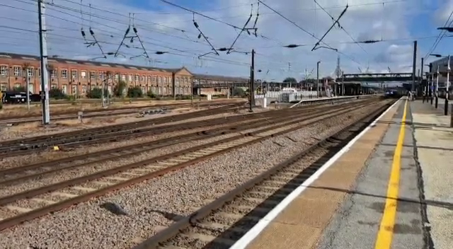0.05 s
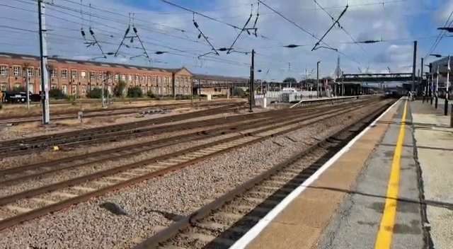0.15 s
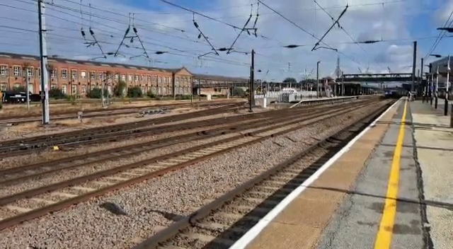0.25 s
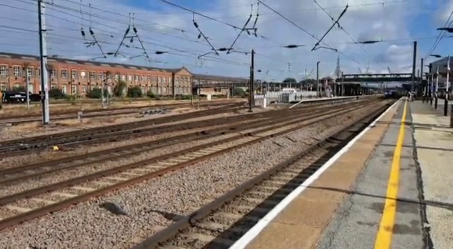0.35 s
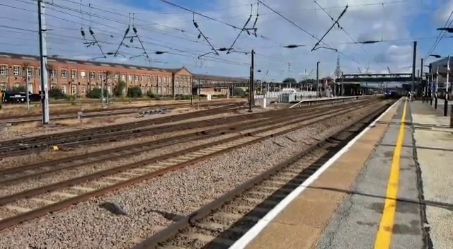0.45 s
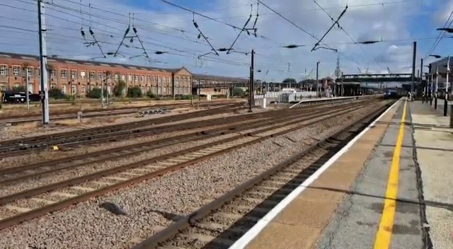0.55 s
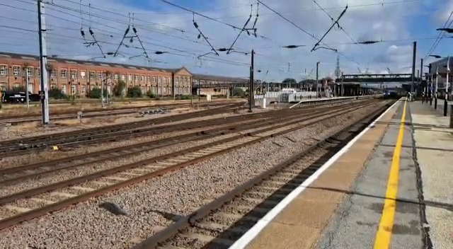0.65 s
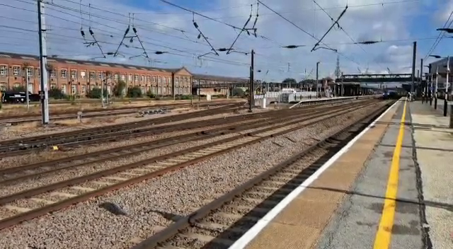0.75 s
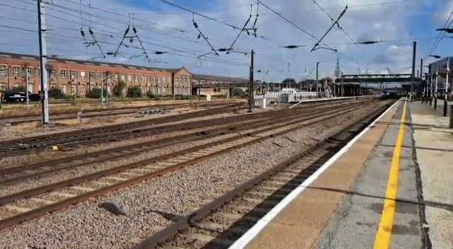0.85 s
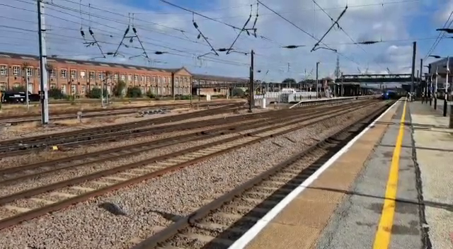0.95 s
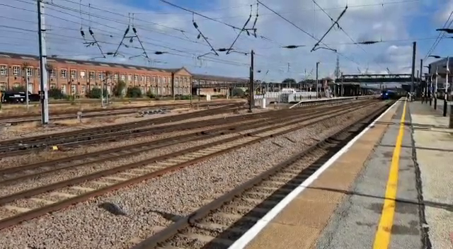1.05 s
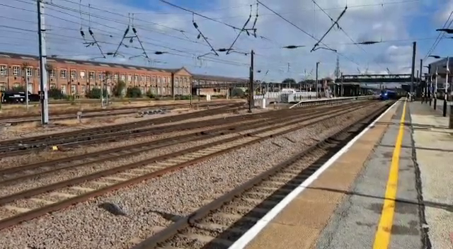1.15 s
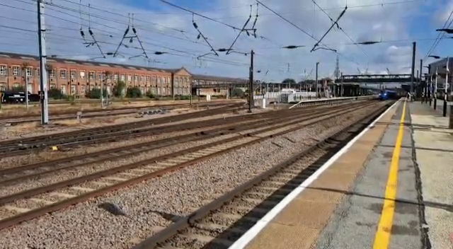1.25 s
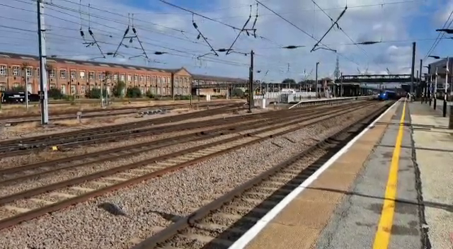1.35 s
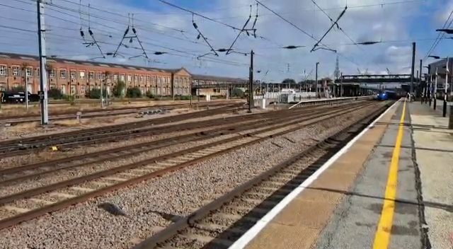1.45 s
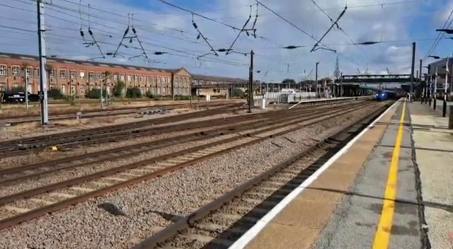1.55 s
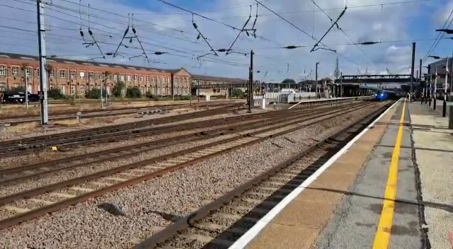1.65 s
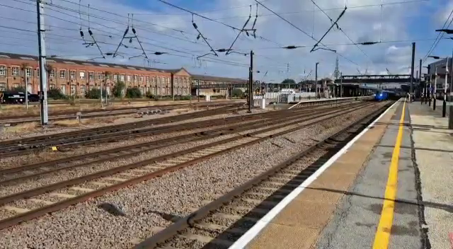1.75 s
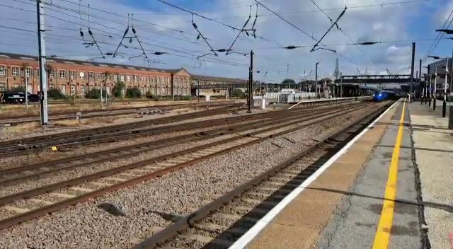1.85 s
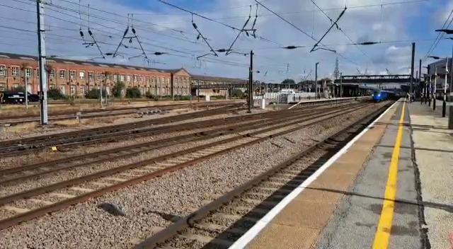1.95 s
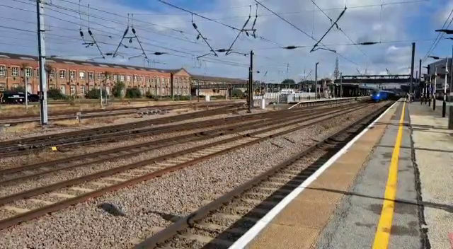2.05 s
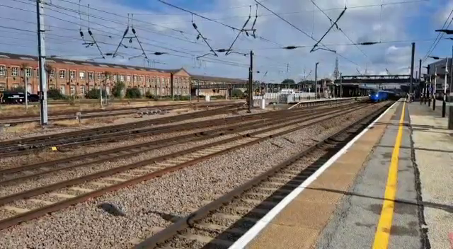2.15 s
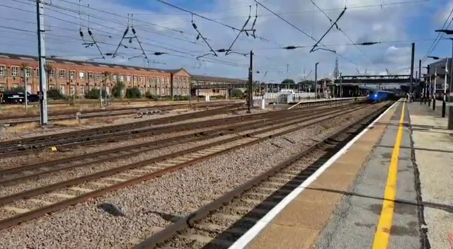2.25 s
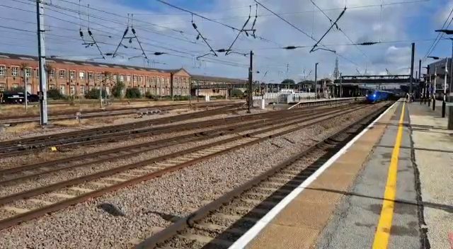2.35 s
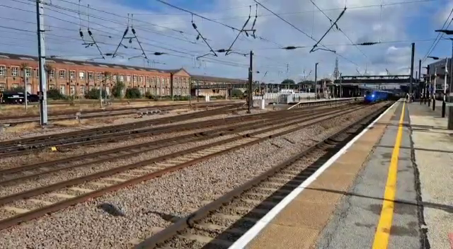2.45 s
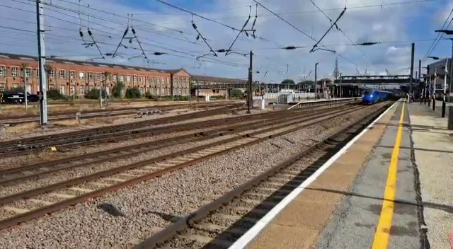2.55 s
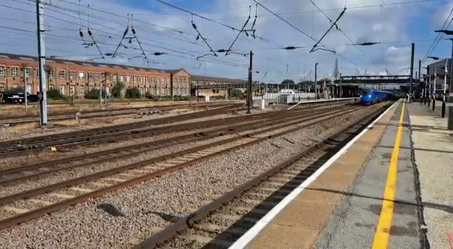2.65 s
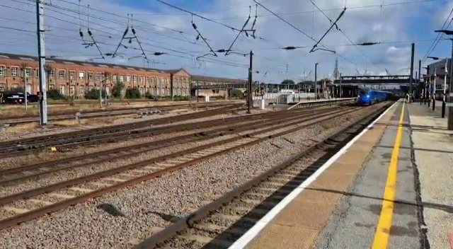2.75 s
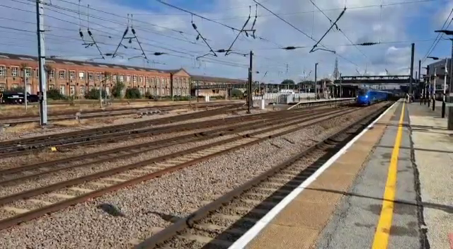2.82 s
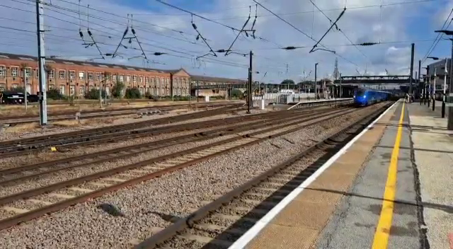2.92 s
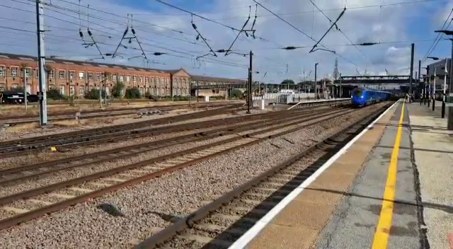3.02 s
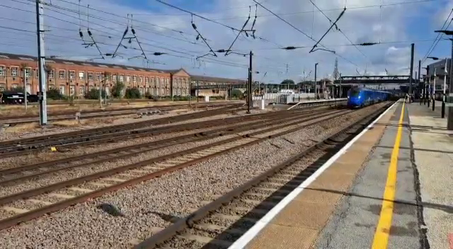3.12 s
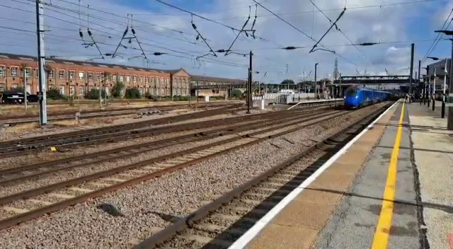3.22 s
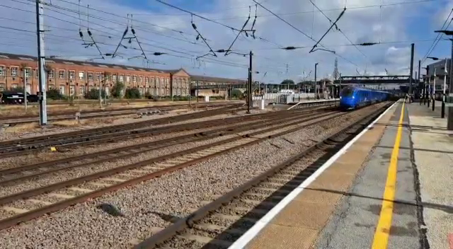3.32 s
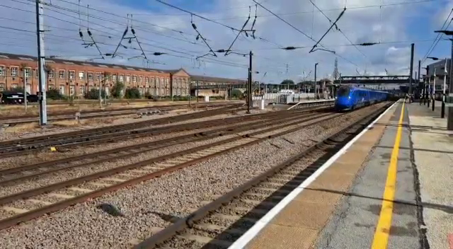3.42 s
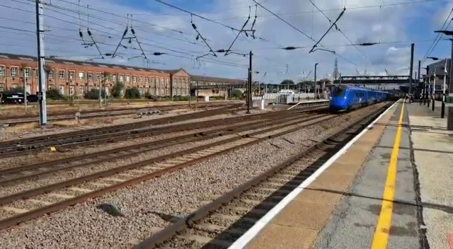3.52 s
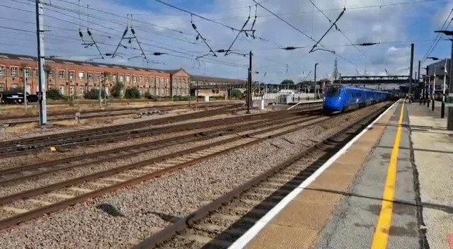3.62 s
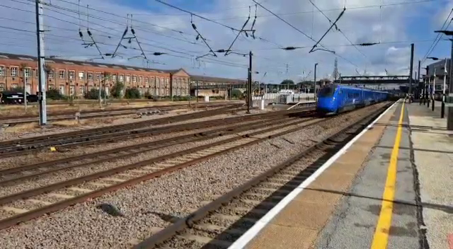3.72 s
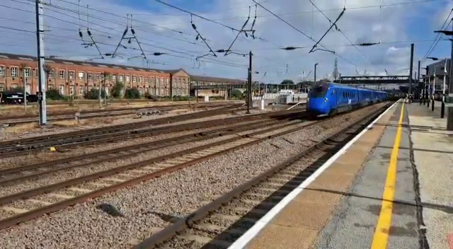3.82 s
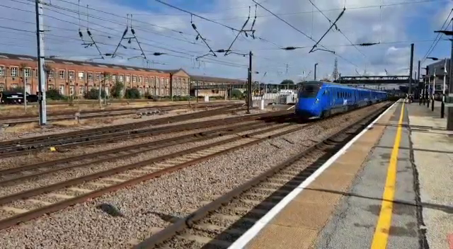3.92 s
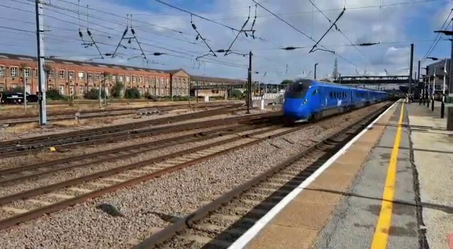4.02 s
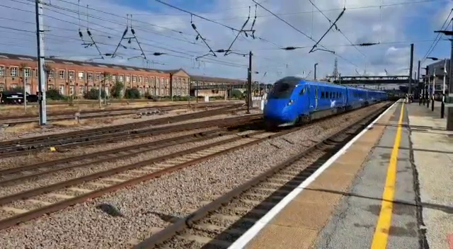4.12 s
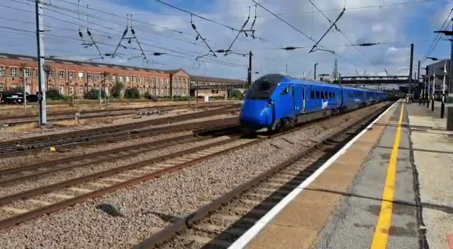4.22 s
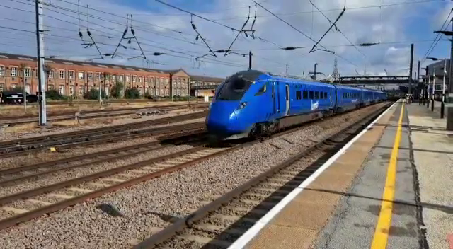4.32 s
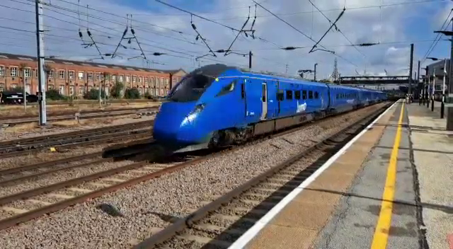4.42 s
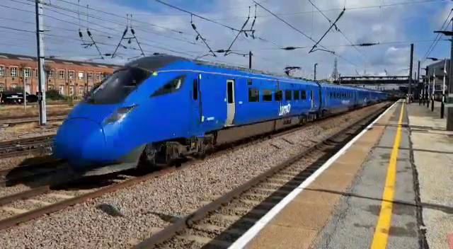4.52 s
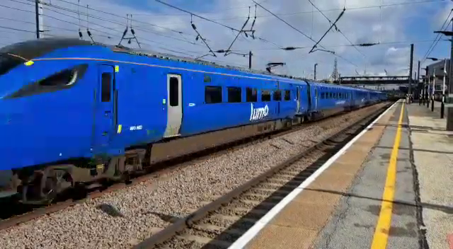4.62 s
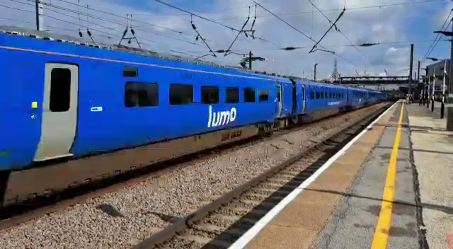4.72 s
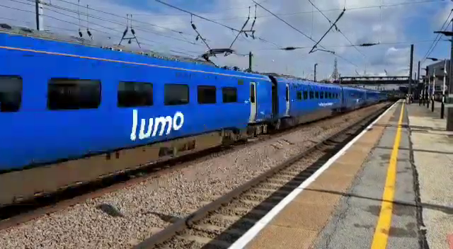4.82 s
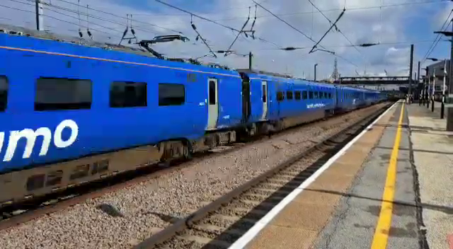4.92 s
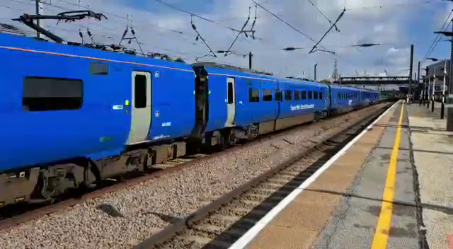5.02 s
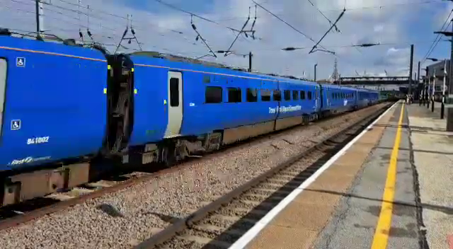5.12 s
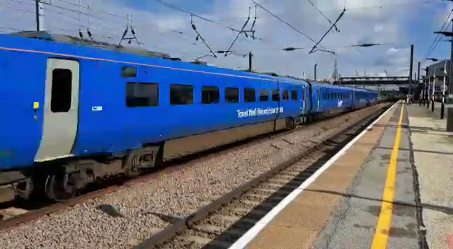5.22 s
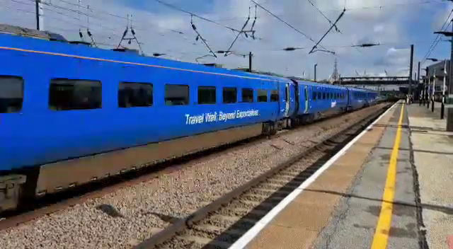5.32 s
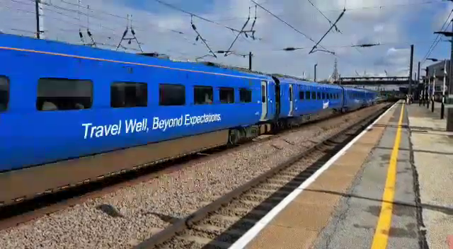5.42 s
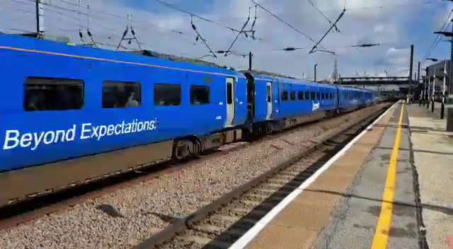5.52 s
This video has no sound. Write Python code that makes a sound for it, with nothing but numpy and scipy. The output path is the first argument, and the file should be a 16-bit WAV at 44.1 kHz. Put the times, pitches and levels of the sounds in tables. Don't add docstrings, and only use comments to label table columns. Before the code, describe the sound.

Quiet station air with wind bumps and a faint bird, then singing rails and a fast electric train roaring past the platform.

```python
import sys
import numpy as np
from scipy import signal
from scipy.fft import rfft, irfft, next_fast_len
from scipy.io import wavfile
from scipy.ndimage import uniform_filter1d

SR = 44100
rng = np.random.default_rng(int(sys.argv[2]) if len(sys.argv) > 2 else 0)


def dump(signal):
    limited = np.clip(np.atleast_2d(signal).T, -1, 1)
    pcm = np.round(limited * 32767).astype(np.int16)
    wavfile.write(sys.argv[1], SR, pcm)


def to_linear_factor(level_db):
    exponent = np.asarray(level_db, float) / 20
    return 10 ** exponent


N = 245637
T = np.arange(N) / SR
HZ = np.fft.rfftfreq(next_fast_len(N), 1 / SR)

SPEED_M_S, CLOSEST_M = 50, 6
NOSE_S = 4.76


def evened(x):
    return x / np.sqrt(np.mean(x ** 2) + 1e-20)


def steadied(x, size):
    power = uniform_filter1d(np.atleast_2d(x).mean(0) ** 2, size=size)
    return x / np.sqrt(power + 0.34)


def read(points, hz):
    f, value = np.transpose(points)
    return np.interp(np.log(hz + 1), np.log(f + 1), value)


def columns(rows, t, before=-120):
    s, *values = np.transpose(rows)
    return np.array([np.interp(t, s, v, left=before) for v in values])


def drift(rate_hz, count=24):
    f = np.geomspace(rate_hz / 8, rate_hz, count)[:, None]
    slow = np.sin(2 * np.pi * (f * T[::64] + rng.random((count, 1)))).sum(0)
    return evened(np.interp(T, T[::64], slow))


def modes(rows):
    power = 0
    for hz, width, db in rows:
        power = power + to_linear_factor(db) ** 2 / width / (1 + (2 * (HZ - hz) / width) ** 2) ** 2
    return np.sqrt(power)


# pitch in Hz, likeness from 0 to 1.
SAME = [(60, 0.9), (270, 1), (450, 0.71), (1100, 0.9), (1700, 0.44), (2200, 0.77), (3300, 0.11),
        (5500, 0.067), (7500, 0.16), (15000, 0.25)]
# pitch in Hz, lead in radians.
LEAD = [(0, 0), (250, .2), (690, 1.1), (1890, 6.2), (3270, 10.6), (4650, 15.5), (6290, 18.85),
        (16000, 18.85)]
# pitch in Hz, difference in dB.
LOUDER_LEFT = [(60, 7), (180, -0.5), (550, 0), (1650, -2), (4970, -2), (15000, -0.5)]


def ports(gain):
    a, b, c, d = rng.standard_normal((4, len(HZ)))
    left, other = a + 1j * b, c + 1j * d
    same, lead = np.clip(read(SAME, HZ), 0, 1), np.interp(HZ, *np.transpose(LEAD))
    right = same * left * np.exp(-1j * lead) + np.sqrt(1 - same ** 2) * other
    summed = np.sqrt((1.52 + same * np.cos(lead)) / 2)
    tilt = to_linear_factor(read(LOUDER_LEFT, HZ) / 2)
    pair = irfft(np.array([left * tilt, right / tilt]) * gain / summed)[:, :N]
    return pair / np.sqrt(np.mean(pair.mean(0) ** 2))


def bumps(rows):
    s, half = np.transpose(rows)[:2, :, None]
    return np.exp(-((T[::64] - s) / half) ** 2)


def swells(rows, db):
    return np.interp(T, T[::64], to_linear_factor(db) @ bumps(rows))


# middle in seconds, half length in seconds, peak in dB, pitch in Hz.
RINGS = [(3.567, 0.21, -31, 604), (4.27, 0.11, -26.5, 604), (3.9, 0.67, -30, 604), (2.717, 0.03, -55, 1744),
         (2.94, 0.017, -36, 1744), (3.07, 0.014, -33, 1744), (3.586, 0.12, -34.5, 1744),
         (3.837, 0.067, -21, 1744), (4.02, 0.097, -23, 1744), (4.318, 0.11, -24.5, 1744),
         (4.72, 0.06, -28.5, 1744), (5.035, 0.031, -23.5, 1744), (5.277, 0.17, -25, 1744),
         (5.57, 0.06, -32, 1744), (2.688, 0.2, -36.5, 185), (3.5, 0.51, -35, 185), (4.2, 0.33, -27.5, 185),
         (4.734, 0.21, -23.5, 185), (5.16, 0.04, -21.5, 185), (4.745, 0.014, -34, 3480),
         (4.816, .035, -33, 3480), (4.878, .025, -32, 3480), (5.323, .012, -33, 3480),
         (5.4, 0.046, -40, 3480), (5.495, .03, -37, 3480)]


def rung(hz):
    rows = np.array([row for row in RINGS if abs(np.log(row[3] / hz)) < .3])
    return swells(rows, rows[:, 2])


STEPS_S = [2.12, 2.68, 3.33]
STEP_SPAN_S = [.004, .004, .1]
# middle in seconds, half length in seconds, change in dB, pitch in Hz.
SURGES = [(1.107, 0.04, 8, 350), (2.107, 0.12, 8, 950), (1.6, 0.039, 15, 600), (2.781, 0.059, 8.5, 600),
          (1.92, 0.1, -5, 350), (2.5, .11, 12.5, 12200), (2.25, .15, -2, 9500), (3.7, 0.04, -14, 7200),
          (1.4, 0.42, 1.5, 4000), (3.7, 0.11, -4, 350), (4.45, 0.059, 1, 950), (5.15, 0.075, -3.5, 4000),
          (2.56, 0.092, 3, 950), (5.05, 0.48, -4.5, 7200), (5.2, .4, 0.5, 350), (4.3, 0.2, 1, 350),
          (5.4, 0.05, 4, 4000), (1.86, 0.69, 7.5, 350), (2.65, 0.14, 3.5, 12200), (2.5, 0.12, -4, 600),
          (3.9, 0.046, 1.5, 600), (3.1, 0.044, 0.5, 600), (4.79, 0.065, -15, 600), (5.1, 0.069, 4, 600),
          (5.27, 0.045, -6, 600), (5.43, 0.031, -30, 600), (2.726, 0.024, 5, 1200), (3.14, 0.14, 5, 7200),
          (4, 0.018, -8, 1830), (3.23, 0.13, -7, 1830), (3.7, 0.068, 6.5, 1830), (4.17, 0.15, 8, 1830),
          (5, 0.065, 9.5, 1830), (4.5, 0.15, -16, 1830), (3.26, 0.19, -7.5, 2280), (3.1, 0.075, 3.5, 2280),
          (5.1, 0.093, 3.5, 2280), (4.8, 0.029, 1, 2280), (4.52, 0.096, 23, 1830)]


def law(full_db, loss_db, fade_db, steps_db=(0, 0, 0), hz=1, spread_db=0, within_m=0):
    t = T[::64]
    ahead_m = SPEED_M_S * np.maximum(NOSE_S - t, 0)
    db = full_db - spread_db * np.log10(np.hypot(ahead_m / CLOSEST_M, 1))
    db -= loss_db * np.maximum(ahead_m - within_m, 0) / 100
    db -= fade_db * np.maximum(t - NOSE_S, 0)
    for held_db, s, span in zip(steps_db, STEPS_S, STEP_SPAN_S):
        db -= held_db * np.clip((s - t) / span + .5, 0, 1)
    surge_db, surge_hz = np.transpose(SURGES)[2:]
    db += (surge_db * (abs(np.log(surge_hz / hz)) < .1)) @ bumps(SURGES)
    return np.interp(T, t, db)


# pitch in Hz, level in dB per Hz.
YARD = [(150, -30), (250, 1), (302, 5), (444, 3.5), (632, 5), (1160, -13), (1430, 1), (1560, -36),
        (1950, -0.5), (2810, -15), (3170, -14), (3500, -47), (4550, -60), (7700, -120)]
# pitch in Hz, width in Hz, level in dB.
DRONE = [(1878, 73, 0)]
# pitch in Hz, level in dB per Hz.
AIR = [(2500, -30), (3500, -1), (4500, 0), (5400, -1), (6400, -8), (7000, -8), (7800, -5), (8600, -11),
       (9500, -19), (12300, -18), (15700, -18)]


def yard():
    left, right = to_linear_factor(-47.5 - 5.0) * ports(to_linear_factor(read(YARD, HZ))) + to_linear_factor(-65 + 4.2 * drift(15)) * ports(modes(DRONE))
    far = np.array([np.roll(left, 30), right])
    hiss_db = -70.5 + 1.9 * np.minimum(T, STEPS_S[1])
    return far + to_linear_factor(hiss_db) * ports(to_linear_factor(read(AIR, HZ)))


# middle in seconds, half length in seconds, deep level in dB, thud level in dB.
GUSTS = [(0.24, 0.093, -50, -57), (0.512, 0.033, -41, -51), (0.642, 0.039, -40, -46),
         (0.775, 0.04, -35, -44.5), (0.925, 0.028, -42, -63), (1.102, 0.095, -41, -44),
         (1.323, 0.037, -40, -53), (1.54, 0.11, -34, -38), (1.742, 0.056, -31.5, -38.5),
         (2.09, 0.11, -39, -37.5), (2.356, 0.068, -42, -36.5), (2.603, 0.14, -33.5, -35.5),
         (2.754, 0.05, -38, -34), (2.946, 0.036, -31, -40), (3.075, .04, -27.5, -40),
         (3.24, 0.069, -32.5, -49), (3.548, 0.16, -34, -45), (3.78, 0.021, -33.5, -33),
         (3.942, 0.095, -29.5, -60), (4.184, 0.081, -27.5, -43), (4.344, 0.12, -29, -36),
         (4.683, 0.088, -20, -33), (4.763, 0.023, -46, -23), (4.881, 0.052, -21.5, -20),
         (5.04, 0.14, -24, -30), (5.147, 0.041, -19.5, -49), (5.3, 0.095, -24.5, -50),
         (5.498, 0.033, -20.5, -36), (5.57, .03, -33, -22)]
# level alongside in dB, spreading in dB per decade of distance,
# loss in dB per 100 m, fade in dB per second after the nose.
LULL_LAW = [(-36, 3.9, 3.7, 0.1), (-32, 2.35, 4.9, 23)]
# time in seconds, level of the differing part in dB.
APART = [(0, -10), (1.2, -9), (2.6, -18.5), (3.8, -31), (5.57, -26)]
# time in seconds, peak in dB, pitch in Hz.
THUMPS = [(0.228, -30, 43.1), (0.497, -23, 59), (0.639, -26, 53.8), (0.798, -26, 64.6), (0.931, -24, 65),
          (1.218, -20.5, 137), (1.734, -26, 51.1), (2.339, -9, 116)]


def buffet():
    apart, out = to_linear_factor(columns(APART, T)[0]), np.zeros((2, N))
    deep = [(47.8, 11, -3), (64.8, 10.4, -1)]  # (Hz, width Hz, dB)
    thud = [(131.0, 81, 8.9), (171.0, 31, 1.1), (230, 190, 0.5)]
    low_cut = HZ ** 2 / (HZ ** 2 + 40 ** 2)
    for gust_db, (full, spread, loss, fade), shape in zip(np.transpose(GUSTS)[2:], LULL_LAW, [deep, thud]):
        gain = swells(GUSTS, gust_db) + to_linear_factor(law(full, loss, fade, spread_db=spread))
        colour = modes(shape) * low_cut
        a, b = (evened(irfft(rfft(rng.standard_normal(2 * len(HZ) - 2)) * colour)[:N]) for _ in "ab")
        differing = apart * (1.15 * b - 0.24 * evened(np.gradient(a)))
        out += to_linear_factor(-3.0) * gain * (steadied(a, size=2500) + differing * [[1], [-1]])
    for s, db, hz in THUMPS:
        u = (T - s) * hz - .55
        out += to_linear_factor(db - 9.5) * np.cos(2 * np.pi * u - .6) * np.exp(-(u / 0.74) ** 2)
    return out


# time in seconds, pitch in Hz, level in dB.
BIRD = [
    [(.66, 8100, -76), (.675, 7900, -66), (.71, 7200, -69), (.75, 7700, -69), (.79, 7000, -69),
     (.81, 6550, -73), (.84, 7400, -76)],
    [(.91, 8600, -85), (.95, 8000, -68), (.99, 7100, -69), (1.02, 7500, -77), (1.05, 6270, -72),
     (1.075, 6000, -71)],
    [(.92, 8600, -66), (.95, 8450, -85), (1.03, 8550, -86)],
    [(1.12, 7300, -80), (1.16, 7700, -74), (1.2, 7500, -79)],
]


def bird():
    out = np.zeros(N)
    for rows in BIRD:
        hz, db = columns(rows, T)
        db[T > rows[-1][0]] = -120
        turn = 2 * np.pi * np.cumsum(hz + 150 * drift(600)) / SR
        out += to_linear_factor(db + 2.5 * drift(59.8)) * np.sqrt(2) * np.sin(turn)
    echo = rng.standard_normal(9000) * to_linear_factor(-60 * T[:9000] / .9)
    return out + to_linear_factor(2.5) * signal.oaconvolve(out, echo / np.linalg.norm(echo))[:N]


ROLL_HZ = [350, 950, 4000, 9500]
# pitch in Hz, level in dB per Hz.
ROLL_COLOUR = [(88, -8.5), (150, -3), (359, -2.5), (445, -11.5), (607, 3.5), (1020, -5), (1240, -3),
               (1480, -6.5), (1760, 0.5), (2180, -9.5), (2700, -16), (3300, -19.5), (4600, -23),
               (7860, -30.5), (8660, -32.5), (13000, -36), (15500, -39)]
# level alongside in dB, spreading in dB per decade of distance, loss in dB per 100 m,
# fade in dB per second after the nose.
ROLL_LAW = [
    (-33, 9.5, 6, 0.3),
    (-36, 0, 10, 4.5),
    (-39, 5.5, 12.5, 0.8),
    (-40.5, 2.5, 6.5, -2),
]
# dB held back by the first, second and third step.
ROLL_STEPS = [(1.5, 0.1, 0.092), (4.3, 5.6, 0.092), (0.59, 1.25, 0.1), (11.4, 3.1, 9.6)]


def rolling():
    hz, t, z = signal.stft(ports(to_linear_factor(read(ROLL_COLOUR, HZ))), SR, nperseg=512, noverlap=384)
    regions_db = []
    for (full, spread, loss, fade), held, f, boost in zip(ROLL_LAW, ROLL_STEPS, ROLL_HZ, [15, 14, 20, 24]):
        regions_db.append(np.interp(t, T, law(full, loss, fade, held, f, spread)) + boost)
    shares = np.array([read(list(zip(ROLL_HZ, row)), hz) for row in np.eye(4)])
    patches = rng.standard_normal((len(t), len(hz))).T
    patches = evened(uniform_filter1d(uniform_filter1d(patches, size=8, axis=0), size=24, axis=1))
    jolts = rng.standard_normal(len(t))
    flicker, rattle = evened(uniform_filter1d(jolts, size=20)), evened(uniform_filter1d(jolts, size=5))
    near_side = 7.0 * np.exp(-((hz[:, None] - 420) / 55) ** 2) * (t > NOSE_S)
    field_db = shares.T @ np.array(regions_db) + near_side
    field_db = field_db + 1.72 * patches + 0.22 * flicker + 1.1 * rattle
    return signal.istft(z * to_linear_factor(field_db), SR, nperseg=512, noverlap=384)[1][:, :N]


# middle in seconds, half length in seconds, peak in dB, pitch in Hz.
FLUTTER = [(1.086, .036, -35, 141), (1.131, .031, -42, 311), (1.736, .013, -29, 131),
           (2.071, .009, -49, 2571), (5.21, .015, -33, 2850), (2.291, .005, -32, 1400),
           (4.411, .0015, -13, 1551), (4.538, .003, -17, 1501), (2.789, .007, -14, 601),
           (2.701, .021, -29.5, 1745), (2.761, .024, -28.5, 1745), (2.151, .005, -32, 1800)]
RATTLE = [(1.124, 0.0095, -43, 614.0), (1.586, 0.009, -39, 662), (1.677, 0.0088, -42, 583),
          (1.737, 0.0092, -36, 607), (1.748, 0.012, -40, 1093.0), (1.753, 0.017, -44, 1814.0),
          (1.771, 0.016, -34, 599), (2.036, 0.0083, -33.5, 1410), (2.046, 0.013, -40, 599),
          (2.055, 0.0066, -32, 795), (2.075, 0.013, -42, 626), (2.11, 0.012, -30, 1034.0),
          (2.112, 0.009, -30, 1330.0), (2.128, 0.0099, -26, 631), (2.153, 0.011, -28, 1486.0),
          (2.172, 0.0097, -28, 756), (2.166, 0.012, -45, 2374.0), (2.188, 0.017, -42, 1810),
          (2.195, 0.014, -34, 1000), (2.236, 0.015, -34, 604), (2.25, 0.009, -35, 1001.0),
          (2.309, 0.006, -28, 866), (2.325, 0.011, -38, 600), (2.35, 0.025, -48, 2885.0),
          (2.368, 0.009, -34, 1013), (2.393, 0.011, -42, 2290), (2.486, 0.018, -29.5, 1357.0),
          (2.563, 0.015, -35, 618), (2.575, 0.0096, -37, 1620), (2.598, 0.018, -31, 554.0),
          (2.617, 0.012, -30.7, 1230), (2.628, 0.03, -36, 557)]
BEATS = [(2.734, 0.023, -11.5, 605.2), (2.746, 0.036, -20, 619.0), (2.772, 0.011, -5.5, 574),
         (2.806, 0.0074, -11, 646.0), (2.835, 0.0066, -9.5, 584), (2.853, 0.01, -16.5, 617),
         (2.894, 0.0053, -3.5, 610), (3.022, 0.02, -14.5, 593.3), (3.041, 0.021, -14, 600),
         (3.085, 0.011, -11.5, 596), (3.14, 0.016, -10, 581.0), (3.189, 0.022, -7, 612.4),
         (3.271, 0.022, -14, 638), (3.332, 0.021, -18.5, 585), (3.439, 0.029, -13.5, 627),
         (3.494, 0.022, -12, 614), (3.556, 0.0098, -7.5, 608.0), (3.593, 0.0055, -13.5, 596.5),
         (3.632, 0.0085, -14, 619.4), (3.69, 0.038, -22, 606), (3.715, 0.015, -32, 596),
         (3.735, 0.02, -30, 619.0), (3.764, 0.014, -15, 626), (3.824, 0.0071, -15, 550),
         (3.854, 0.032, -18, 613), (3.938, 0.006, -14, 622), (4.059, 0.011, -11.5, 614.0),
         (4.125, 0.022, -20, 587.0), (4.144, 0.028, -25, 621.5), (4.235, 0.016, -14.5, 603.0),
         (4.305, 0.018, -19, 600.3), (4.353, 0.021, -13, 602), (4.457, 0.018, -14, 588),
         (4.474, 0.015, -12, 653), (4.574, 0.017, -13, 592.0), (4.626, 0.031, -12.5, 612),
         (4.654, 0.02, -14, 617), (4.692, 0.025, -12.5, 629), (4.709, 0.023, -15, 591),
         (4.73, 0.013, -22, 640), (4.832, 0.0091, -24, 615), (4.885, 0.01, -18, 624.0),
         (4.961, 0.01, -12, 619.0), (5.255, 0.009, -8.5, 624.0), (5.308, 0.02, -15, 640),
         (5.332, 0.019, -18, 603.5)]
UPPER_BEATS = [(3.52, 0.024, -24.5, 2315), (3.81, 0.025, -22, 2342.0), (4.69, 0.038, -22, 2225),
               (3.993, 0.018, -24, 2320), (4.114, 0.018, -25, 2316), (4.135, 0.005, -10.5, 1650.0),
               (4.2, 0.0068, -13, 1870), (4.206, 0.011, -13.5, 2320.0), (4.401, 0.094, -31, 2323),
               (4.435, 0.042, -22.5, 2312), (4.482, 0.04, -23, 2331.0), (4.867, 0.015, -19.5, 2266.0),
               (4.984, 0.006, -21, 2010), (4.925, .015, -26, 3160)]


def bursts():
    out = np.zeros((2, N))
    for rows, trim_db, sag in ((BEATS, -4.5, 0), (UPPER_BEATS, -2.5, 0), (RATTLE, -.5, 7.7), (FLUTTER, -.1, 0)):
        for s, half, db, hz in rows:
            near = slice(round((s - 3 * half) * SR), round((s + 3 * half) * SR))
            t = T[near] - s
            turn = 2 * np.pi * hz * (T[near] - sag * (hz < 900) * t ** 2 / 2)
            lead = np.interp(hz, *np.transpose(LEAD))
            out[:, near] += to_linear_factor(db + trim_db) * np.exp(-(t / half) ** 2) * np.sin([turn, turn - lead])
    return out * to_linear_factor([[-.3], [.3]]) * to_linear_factor(1.03 * drift(250))


# start in seconds, peak in
# dB, ring in Hz.
KNOCKS = [(1.306, -36, 600), (2.029, -35, 577), (2.059, -34, 720), (2.124, -38, 620), (2.149, -30, 1500),
          (2.168, -32, 686), (2.305, -33, 720), (2.389, -31, 658), (2.575, -31, 640), (2.678, -14, 600),
          (2.831, -16, 598), (2.891, -28, 603), (4.852, -9, 800), (4.977, -12, 2050)]


def knocks():
    out, t = np.zeros(N), T[:3000]
    crack_band = signal.butter(3, [800, 2100], "bandpass", fs=SR, output="sos")
    for (s, db, hz), burst in zip(KNOCKS, rng.standard_normal((len(KNOCKS), 3000))):
        peak = signal.iirpeak(hz, 3.5, SR)
        ring = signal.lfilter(*peak, signal.lfilter(*peak, burst))
        tone = np.sin(2 * np.pi * hz * t) + .3 * evened(ring)
        crack = evened(signal.sosfilt(crack_band, burst))
        at = round(s * SR)
        out[at:at + 3000] += to_linear_factor(db - 9 - 60 * t / .06) * crack * np.minimum(t / .002, 1)
        out[at:at + 3000] += to_linear_factor(db - 2 - 60 * t / .08) * tone * np.minimum(t / .004, 1)
    return np.array([out, np.roll(out, 22)])


# pitch in Hz, width in Hz, level in dB.
BANDS = [
    [(610, 90, 0), (530, 50, -6), (690, 70, -5), (490, 20, -15)],
    [(1181, 18, -3), (1205, 130, 0), (1125, 50, -7), (2850, 100, -19), (4570, 320, -26)],
    [(1933, 25, -8), (1830, 160, 0), (1600, 70, -6), (1950, 150, -4)],
    [(2186, 10, -5), (2322, 14, -4), (2349, 16, -8), (2280, 220, 0), (2850, 120, -24)],
]
COMB_HZ = [578.8, 575.5]
COMB_WIDTH_HZ = [100, 200]
# multiple of the spacing, level in dB.
COMB = [
    [(6, -13), (8, -13), (11, -9), (12, 0), (13, 1), (15, -6), (16, -9), (17, -8), (18, -9)],
    [(19, -13), (20, 0), (21, 1), (22, 0), (23, -1), (24, -5), (25, -10), (26, -13)],
]
# pitch in Hz, width in Hz, level in dB.
SHEEN_BED = [(7300, 700, -2), (12600, 1500, 4)]
# pitch in Hz, width in Hz, level in dB.
HUM_MODE = [(181.5, 15.3, 0)]
SQUEAL_MODES = [(3480, 220, 2)]
RAIL_HZ = [600, 1200, 1830, 2280, 7200, 12200]
# full level in dB, full within metres, loss in dB per 100 m beyond,
# fade in dB per second after the nose.
RAIL_LAW = [
    (-23, 99, 25, 3.5),
    (-29.5, 105, 51, 9),
    (-26, 81, 20, 6.5),
    (-24, 37, 8.5, 11),
    (-39, 42.5, 32, 7),
    (-36.5, 39, 21, 7),
]
# dB held back by the first, second and third step.
RAIL_STEPS = [(4, 10.3, 0.085), (6, 8.9, 0.1), (3, 39, 0.1), (6, 26, 3.8), (25, 7.4, 9.4), (30, 11, 9.8)]


def rails():
    levels = []
    for (full, within_m, loss, fade), held, hz in zip(RAIL_LAW, RAIL_STEPS, RAIL_HZ):
        levels.append(law(full, loss, fade, held, hz, within_m=within_m))
    song = np.zeros((2, N))
    for db, band in zip(levels, BANDS):
        song += to_linear_factor(db - 5.5) * steadied(ports(modes(band)), size=2000)
    for mode in (HUM_MODE, SQUEAL_MODES):
        song += to_linear_factor(-3.5) * rung(mode[0][0]) * steadied(ports(modes(mode)), size=5000)
    for db, group, hz, width, bed in zip(levels[4:], COMB, COMB_HZ, COMB_WIDTH_HZ, SHEEN_BED):
        teeth = [(k * hz, width, d) for k, d in group]
        song += to_linear_factor(db - 1.2 + 1.6 * drift(30)) * ports(modes(teeth + [bed]))
    return song


# start in seconds, level in dB, pitch in Hz, seconds to die by 60 dB.
SPARK = [
    (2.12, -55, 8200, .11),
]


def spark():
    out = np.zeros((2, N))
    for s, db, hz, t60 in SPARK:
        fizz_db = np.where(T > s, db - 60 * (T - s) / t60, -140)
        out += to_linear_factor(fizz_db) * ports(modes([(hz, 1500, 0), (12000, 6000, -8)]))
    return out


# pitch in Hz, waver in Hz, and level between rings in dB.
WHINE_HZ = [604.0, 1744.0]
WAVER_HZ = [3.0, 3.5]
WHINE_REST_DB = [-39.5, -42]


def whine():
    out = np.zeros((2, N))
    for hz, waver_hz, rest_db in zip(WHINE_HZ, WAVER_HZ, WHINE_REST_DB):
        turn = 2 * np.pi * np.cumsum(hz + waver_hz * drift(18)) / SR
        lead = np.interp(hz, *np.transpose(LEAD))
        gain = (rung(hz) + to_linear_factor(rest_db)) * (T > STEPS_S[1]) * to_linear_factor(1.0 + 1.6 * drift(30))
        out += gain * np.sin([turn, turn - lead]) / np.cos(lead / 2)
    return out


# pitch in Hz, chance per frame.
STARVED = [(3000, 0), (6000, .004), (8000, .045), (9500, .04), (11300, .07), (12500, .02), (14000, .06),
           (14900, .15), (15500, .45)]
# pitch in Hz, chance per frame.
SLITS = [(3200, 0), (3900, .09), (4700, .02), (5400, .1), (6000, .1), (6600, 0)]
# from and until, in seconds.
SLITS_S = (3.25, 4.2)
# time in seconds, share of bands kept.
WIDE = [(0, 0), (2.68, 0), (2.7, .1), (3.2, .12), (3.4, .4), (5.57, .45)]


def thin_treble(x, busy_s=2.7, band_hz=520):
    hz, t, (mid, side) = signal.stft([x[0] + x[1], x[0] - x[1]], SR, nperseg=512, noverlap=384)
    band, frame = (hz // band_hz).astype(int), ((t * SR + 697) // 1024).astype(int)
    luck, width_luck, flicker = rng.random((frame[-1] + 1, band[-1] + 1, 3)).T
    luck[:, 1:] = np.minimum(luck[:, 1:], luck[:, :-1])
    treble, late = hz[:, None], t > busy_s
    busy = (t > 3.05) | ((t > 2.2) & (treble > 14500))
    lost = luck[band][:, frame] < read(STARVED, (band + .5) * band_hz)[:, None]
    kept = np.where(busy & lost, .01, 1)
    kept *= to_linear_factor(4.5 * (flicker[band][:, frame] - .5) * (late & (treble > 5000)))
    pairs = 2 * (np.arange(len(hz)) // 2)
    slit = rng.random((frame[-1] + 1, len(hz))).T[pairs][:, frame // 3]
    kept *= np.where((slit < read(SLITS, hz)[:, None]) & (t > SLITS_S[0]) & (t < SLITS_S[1]), .05, 1)
    wide = width_luck[band][:, frame // 2] < columns(WIDE, t)
    mono = (treble > np.where(late, 7000, 8300)) & ~wide
    mid, side = signal.istft([mid * kept, side * ~mono], SR, nperseg=512, noverlap=384)[1][:, :N]
    return np.array([mid + side, mid - side]) / 2


def scene():
    before = yard() + buffet() + bird()
    train = rolling() + bursts() + knocks() + rails() + spark() + whine()
    return before + train


def top_cut(x):
    return signal.sosfilt(signal.butter(12, 15650, fs=SR, output="sos"), x)


def record(dry):
    mix = thin_treble(dry)
    return top_cut(mix)


dry = scene()
out = record(dry)
dump(out)
```